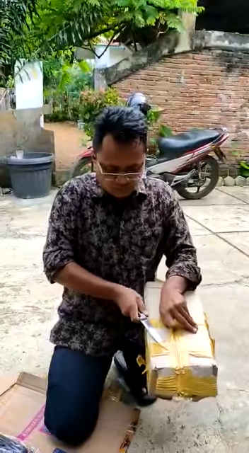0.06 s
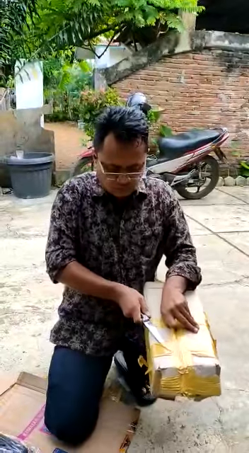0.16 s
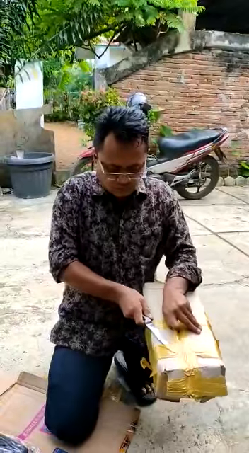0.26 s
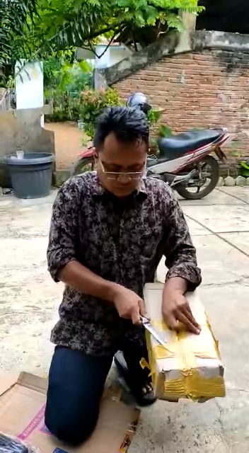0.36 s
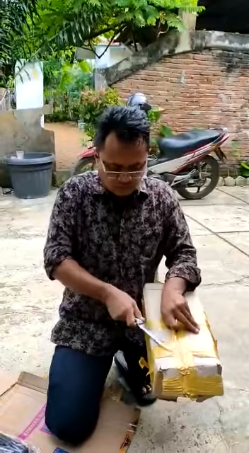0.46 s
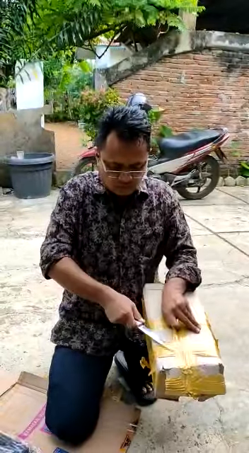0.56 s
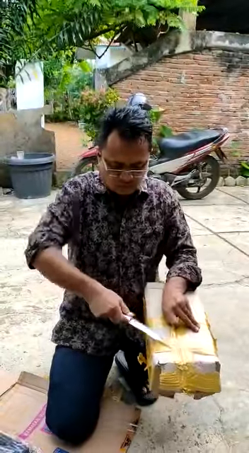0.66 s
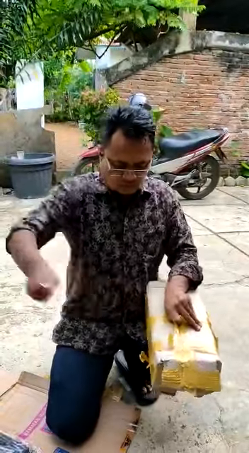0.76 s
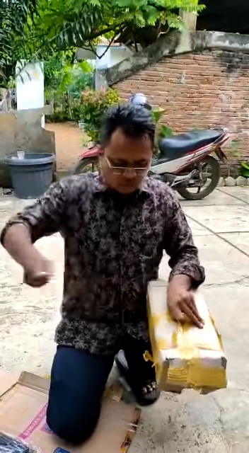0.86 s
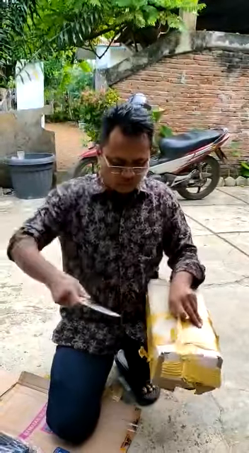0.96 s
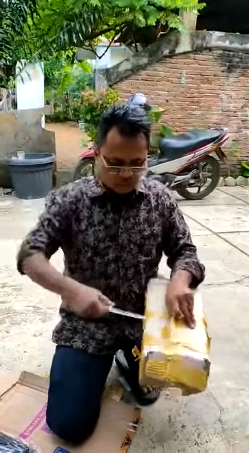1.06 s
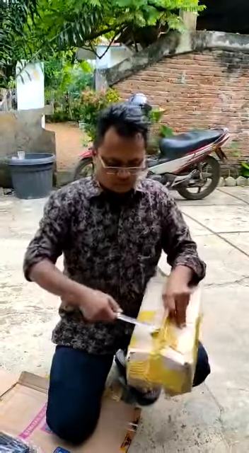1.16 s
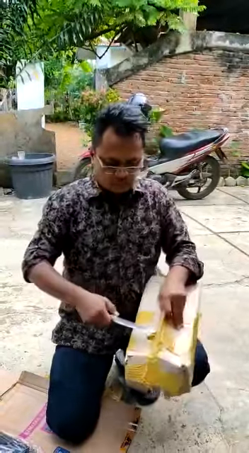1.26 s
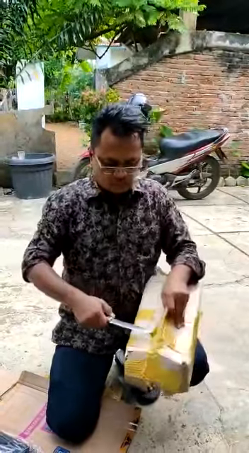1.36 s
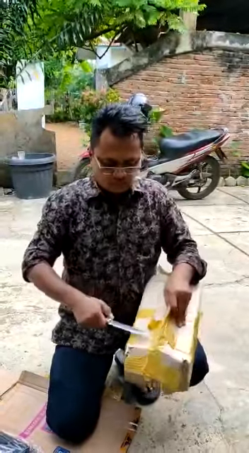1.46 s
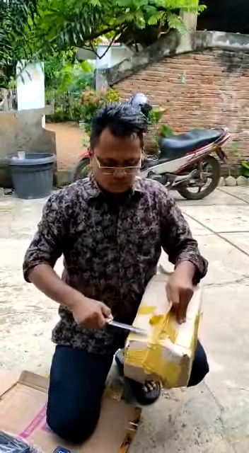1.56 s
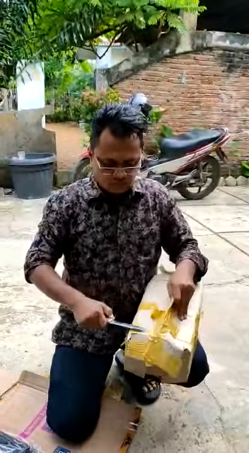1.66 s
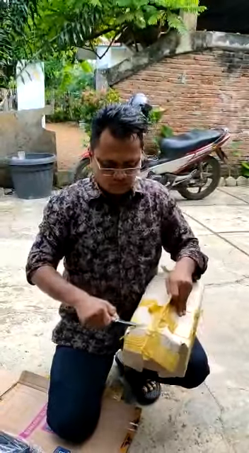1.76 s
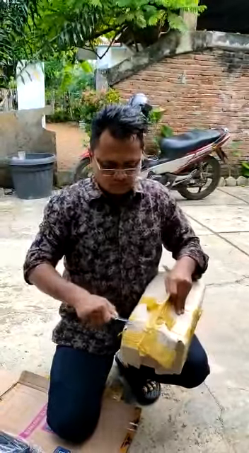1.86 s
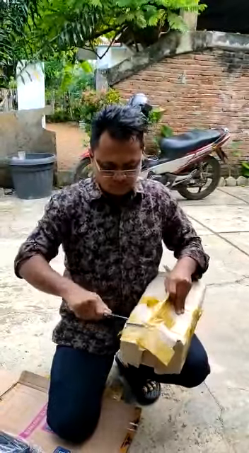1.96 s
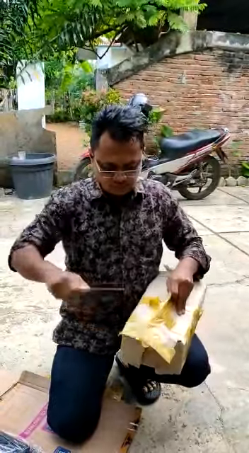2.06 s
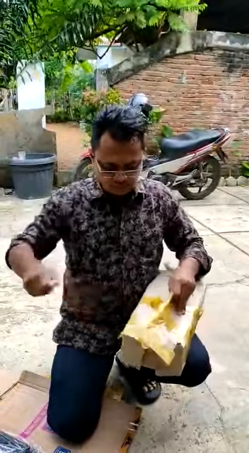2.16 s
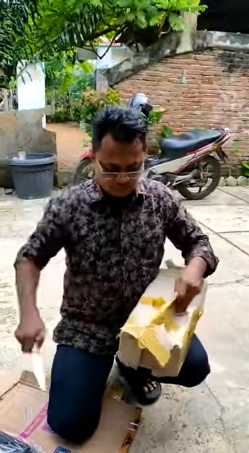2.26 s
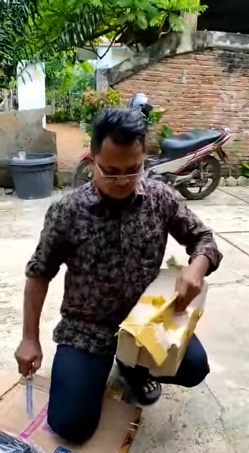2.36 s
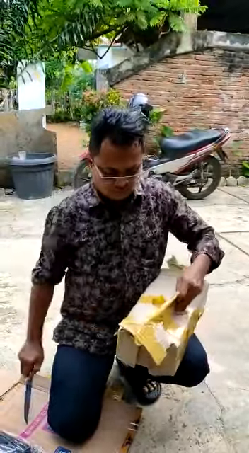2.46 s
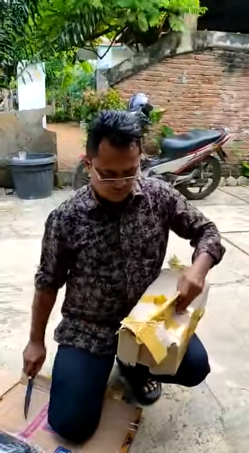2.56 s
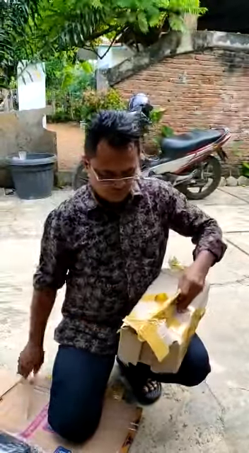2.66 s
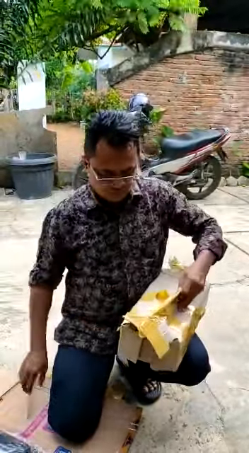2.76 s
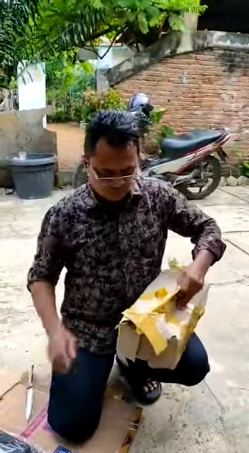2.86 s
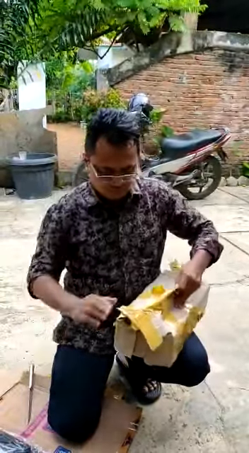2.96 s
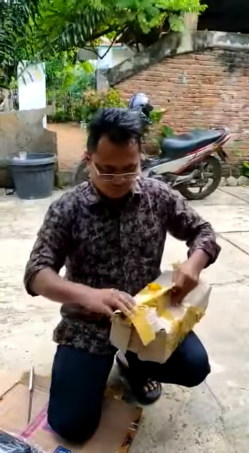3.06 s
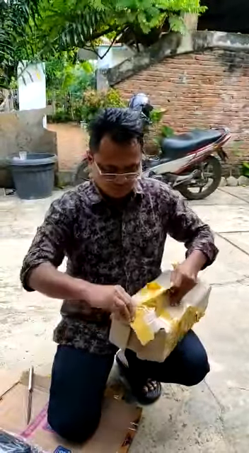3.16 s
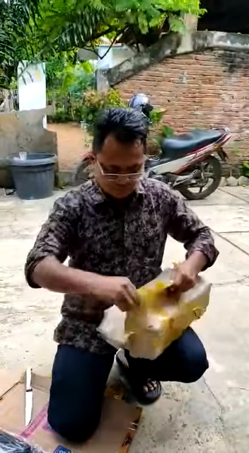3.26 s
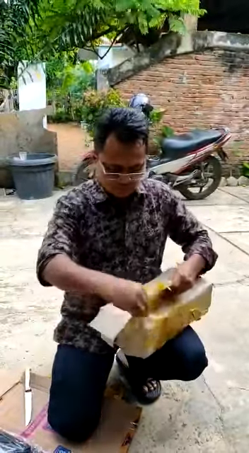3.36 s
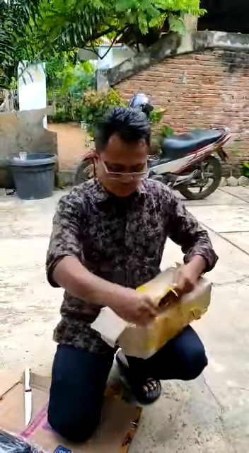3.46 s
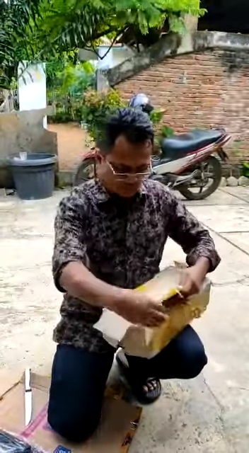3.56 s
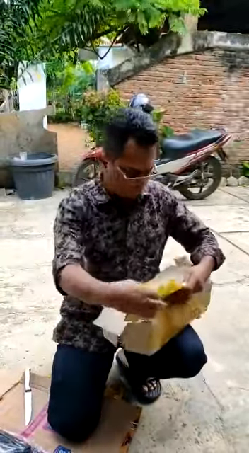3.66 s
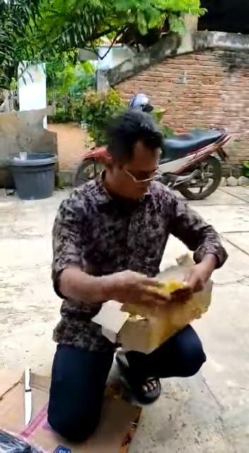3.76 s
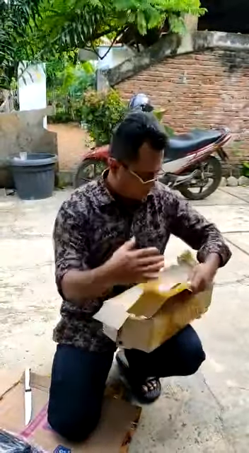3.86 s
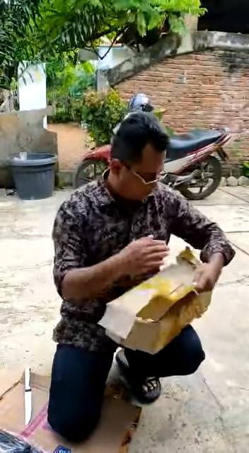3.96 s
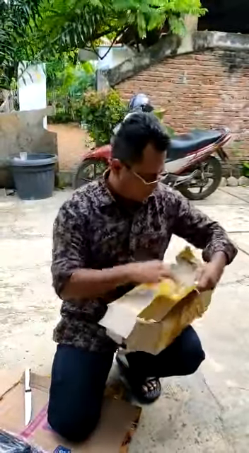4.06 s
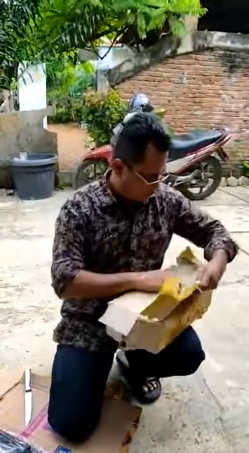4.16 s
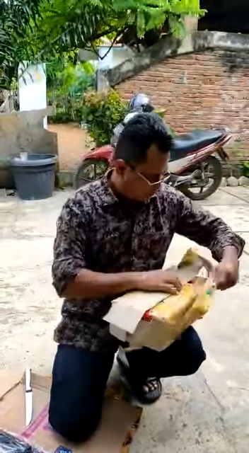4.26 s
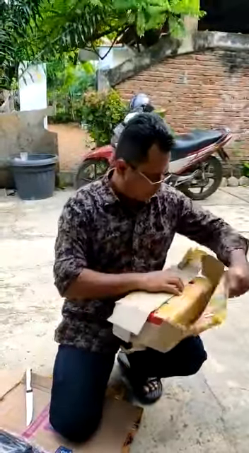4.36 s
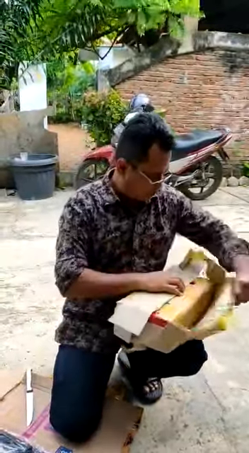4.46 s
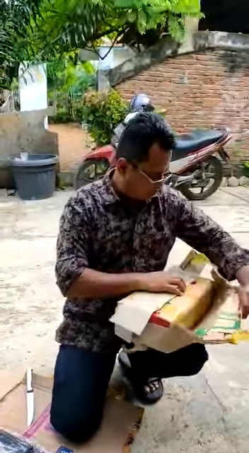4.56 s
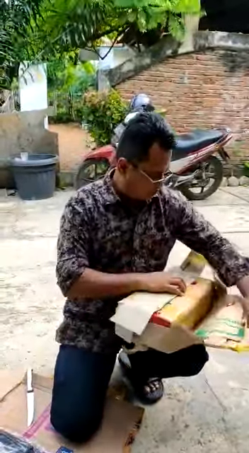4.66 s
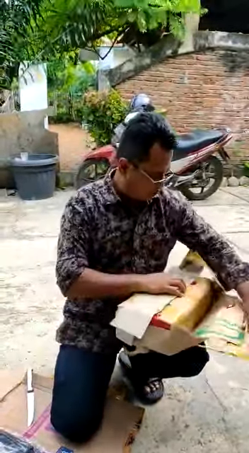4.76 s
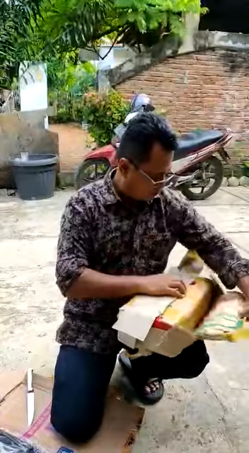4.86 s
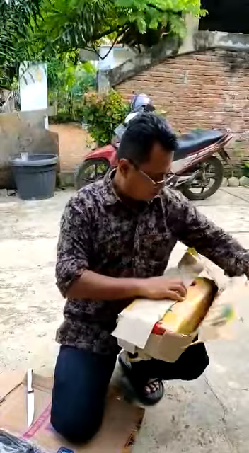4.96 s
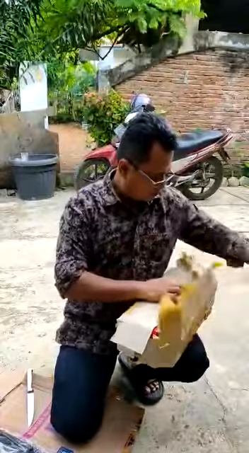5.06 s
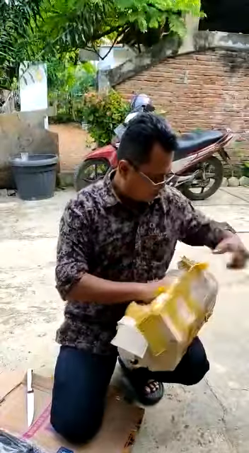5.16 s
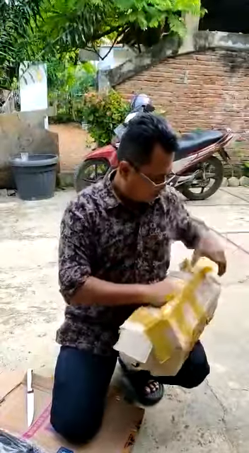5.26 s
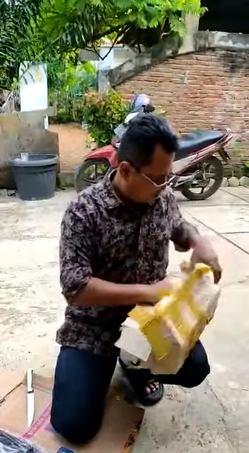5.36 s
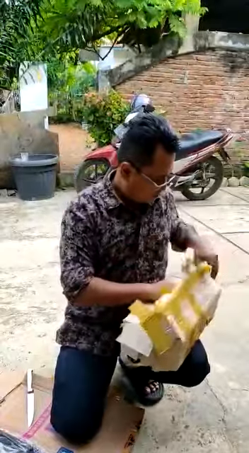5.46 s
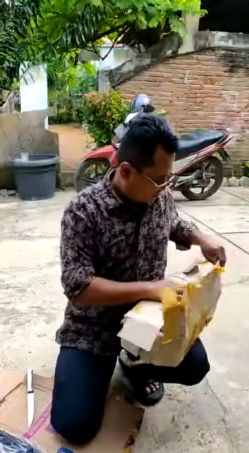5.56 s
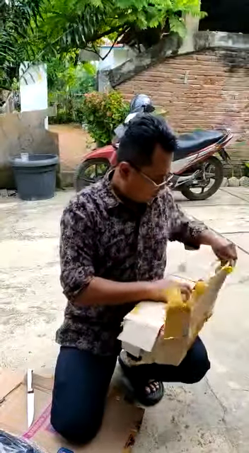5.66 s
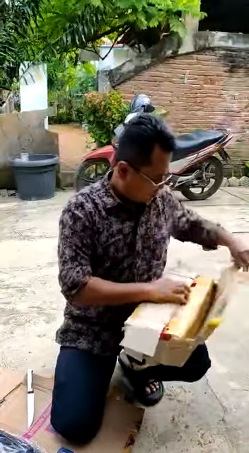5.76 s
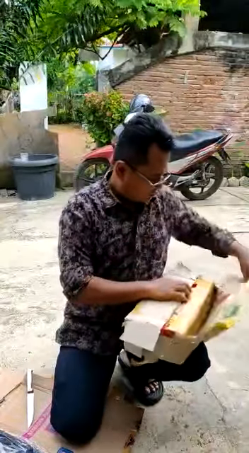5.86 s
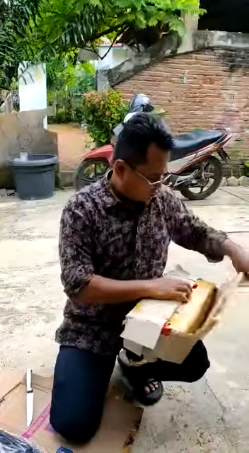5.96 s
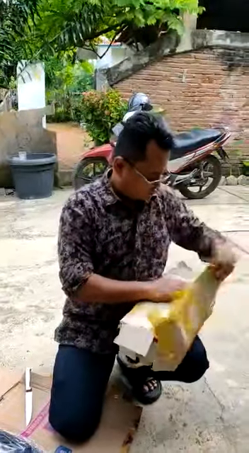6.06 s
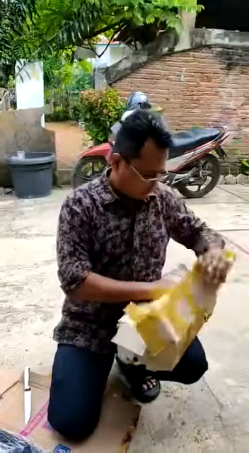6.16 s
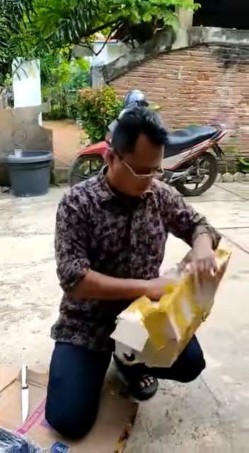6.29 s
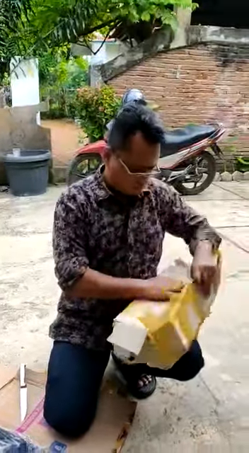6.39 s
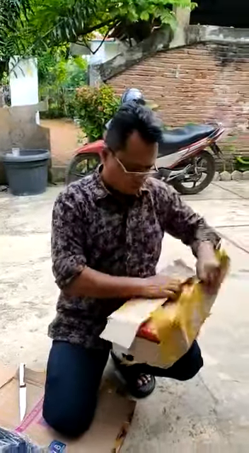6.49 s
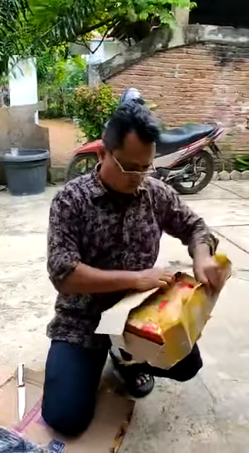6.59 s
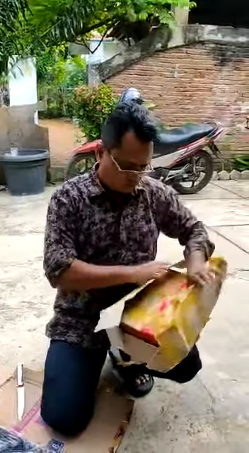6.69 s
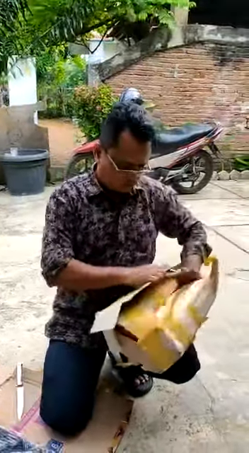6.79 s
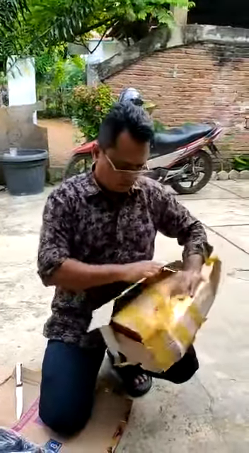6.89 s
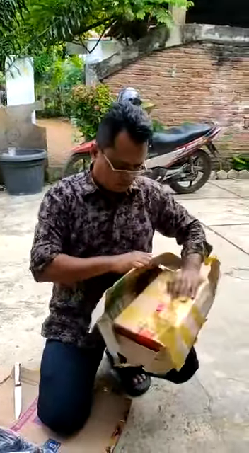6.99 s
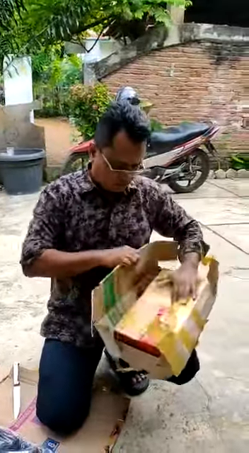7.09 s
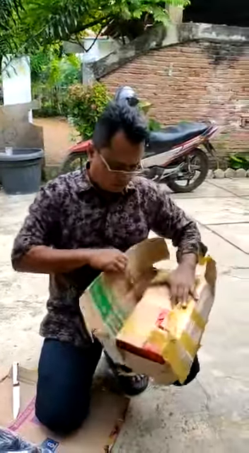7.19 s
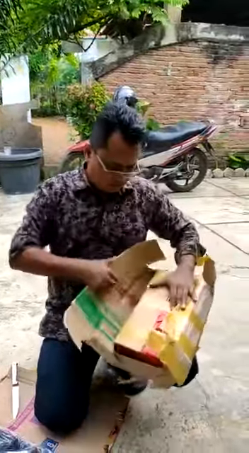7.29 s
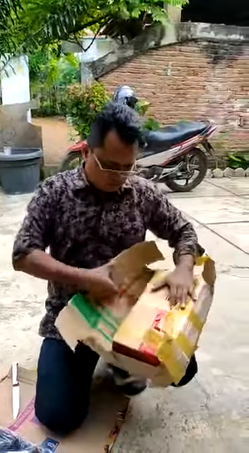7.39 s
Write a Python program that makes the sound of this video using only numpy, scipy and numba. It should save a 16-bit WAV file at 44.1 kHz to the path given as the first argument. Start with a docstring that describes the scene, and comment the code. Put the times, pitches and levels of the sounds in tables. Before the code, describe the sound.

Bright tape crackles, sharp tearing snaps and hollow cardboard thumps as a taped parcel is cut and pulled apart in a quiet yard.

```python
"""A taped cardboard parcel is slit with a knife and pulled open in a walled yard, a metre or two from a phone.
Tiny random fractures make every snap, crinkle and scrape; they ring the bright tape film, the cardboard flaps
and the hollow box. The knife is put down on a flat sheet and rattles; gliding tones make faint squeals.
Random echoes give the walls' short tail. Behind it all, filtered noise makes faint air and a rumble that surges."""
import sys
import numpy as np
from scipy import signal
from scipy.fft import rfft, irfft, next_fast_len
from scipy.io import wavfile
from scipy.ndimage import uniform_filter1d
from numba import njit

SR = 44100
rng = np.random.default_rng(int(sys.argv[2]) if len(sys.argv) > 2 else 0)


def materialize(psi):
    """Save the field psi as 16-bit PCM at rate SR to the path in sys.argv[1].

    A 1-D psi becomes a single channel; in a 2-D psi each row is a channel.
    """
    bounded = np.clip(np.atleast_2d(psi).T, -1, 1)
    quanta = np.round(bounded * 32767).astype(np.int16)
    wavfile.write(sys.argv[1], SR, quanta)


N = 327516
TIME = np.arange(N) / SR

# Levels in these tables are starting points: the functions below trim them, and the yard adds echoes.

# still outdoor air, its balance of low and high: [pitch_hz, level_db]
AIR = [(25, -6), (60, 6.5), (110, 2), (250, -4.5), (450, -6.5), (900, -25), (2500, -40.5), (6500, -24),
       (10000, -25.5), (16000, -30.5)]
# distant rumble, coming in surges: [time_s, level_db]
RUMBLE_LEVEL = [(0.0, -90.5), (2.3, -85), (2.56, -70), (2.92, -74.5), (3.1, -77), (3.7, -84.5),
                (4.7, -74.5), (4.97, -59.5), (5.16, -77.5), (5.24, -59), (5.42, -69.5), (5.55, -56.5),
                (5.9, -61.5), (6.2, -56.5), (6.36, -71.5), (6.45, -60.5), (6.8, -64), (7.42, -67)]
# the rumble's resonances: [pitch_hz, width_hz, level_db]
RUMBLE_BANDS = [(55, 28, -5), (82, 12, 4.5), (113.3, 15, 2.5), (147, 10, -9.5)]

# colour of the yard's echoes: [pitch_hz, level_db]
YARD_COLOUR = [(80, -4.5), (300, 4.5), (1000, -3.5), (2500, 1), (7000, -3.5), (15000, 2)]
# how far the left port leads the right for direct sound: [pitch_hz, lead_radians]
LEFT_LEAD = [(60, 0.01), (580, 0.27), (1000, 1.1), (1550, 1.36), (2550, 0.9), (3200, 1.3), (3800, 1.5),
             (5800, 2.5), (7300, 3.36), (9200, 1.5), (16000, 0.4)]
# where on the parcel the hands work: [time_s, left_minus_right_db]
SIDE = [(0, 0.5), (0.7, 0.1), (1.15, 0.5), (2.0, 1.5), (3.2, 1.5), (3.7, 1.7), (4.3, 0), (5.1, 0.2),
        (6.2, 1.9), (6.7, 1.1), (7.3, 0)]
# how differently the two ports colour the sound: [pitch_hz, left_minus_right_db]
PORTS = [(100, 2.5), (700, -0.5), (1300, -2), (2100, 3.5), (3000, 3.5), (4000, 3.5), (5600, 9), (8000, 2),
         (10500, -7.5), (15000, 3)]

# what the tape film, the flaps and the box radiate: [pitch_hz, level_db]
FILM = [(800, -66.5), (2000, -39), (3000, 0), (4000, -4), (5500, 0.5), (6800, 9), (8300, 4), (10000, -6.5),
        (12500, -12), (15500, -13)]
FLAP = [(300, -29), (550, -14.5), (800, 1), (1250, 5), (1650, 3.5), (2200, 5.5), (3000, -5), (4000, -17),
        (7000, -28.5)]
BOX = [(40, -16), (100, -3.5), (200, -2), (330, -0.5), (480, 3), (650, 3), (900, -29), (1600, -41.5)]
# a crease letting go is brighter than rubbed film: [pitch_hz, level_db]
SNAP = [(800, -45), (2000, -23), (3000, -7), (4200, -4), (6500, 10), (8300, 9), (10500, -5.5), (13000, -3),
        (16000, -10)]
# panel and cavity resonances of the parcel: [pitch_hz, width_hz, level_over_broad_response_db]
PANELS = [(230, 19, -7), (329, 6.7, -7), (420.4, 30, 0.5), (716, 89, -4.5), (954, 18, -13),
          (1253, 25, -1.5)]
# ring of the hollow box: it sinks a little, then climbs as the mouth is pulled wider: [time_s, pitch_hz]
HOLLOW_PITCH = [(0.7, 312), (4.9, 280), (5.85, 380), (7.0, 560)]

# faint squeals, nearly pure in tone: [start_s, length_s, first_hz, last_hz, level_db]
SQUEALS = [(0.317, 0.054, 440, 418, -60), (0.398, 0.03, 390.3, 330, -49), (0.442, 0.056, 355, 397, -60.5),
           (0.474, 0.046, 569, 580, -67), (0.591, 0.046, 1087, 1125, -60),
           (0.634, 0.073, 1140, 1220, -69.5), (2.703, 0.33, 1106, 1131, -70.5),
           (2.924, 0.061, 896, 852, -67.5), (5.396, 0.09, 910, 901, -68.5), (5.469, 0.12, 900, 930, -74),
           (6.068, 0.12, 500, 602, -63.5), (6.802, 0.091, 467, 632, -71.5)]
# cardboard creaking as it is dragged: [start_s, length_s, pitch_hz, width_hz, level_db]
CREAKS = [(0.0, 0.0096, 537, 201, -63), (0.194, 0.047, 423, 78, -70), (0.328, 0.044, 510, 162, -62.5),
          (0.4, 0.048, 537, 195, -62), (0.431, 0.097, 268, 200, -61), (0.591, 0.073, 893, 202, -60.5),
          (1.469, 0.078, 3280, 600, -64), (2.759, 0.21, 1060, 199, -71.5), (3.972, 0.08, 1120, 530, -50),
          (3.976, 0.055, 564, 159, -54.5), (4.534, 0.17, 302, 109, -59), (4.438, 0.046, 1990, 800, -53),
          (4.533, 0.17, 855, 400, -52.5), (4.667, 0.062, 970, 400, -45), (6.425, 0.035, 940, 410, -53),
          (6.499, 0.16, 1710, 900, -61), (6.659, 0.13, 990, 298, -71), (6.66, 0.16, 2000, 696, -62.5),
          (6.881, 0.076, 466, 202, -61), (7.251, 0.08, 850, 400, -43.5)]
# the knife is put down, tip then handle: [start_s, level_db]
KNIFE = [(2.525, -41), (2.590, -35)]
# the knife on the flat sheet: [pitch_hz, width_hz, level_db]
KNIFE_MODES = [(213, 150, -3.5), (670, 270, 3), (846, 370, 2), (1090, 400, -6.5), (2120, 2000, -28)]
# dull bumps of the hands and flaps on the box: [start_s, level_db, wall_pitch_hz, contact_s]
KNOCKS = [(0.138, -53, 784, 0.0056), (1.161, -36, 360, 0.004), (3.274, -43.5, 247, 0.005),
          (4.334, -30, 270, 0.0027), (4.362, -40.5, 268, 0.005), (4.492, -42, 274, 0.0053),
          (4.672, -40, 296, 0.0064), (4.717, -53, 280, 0.0044), (5.843, -44, 320, 0.0047),
          (5.853, -35.5, 410, 0.003), (6.987, -50, 516, 0.0022)]
# the parcel's big panels flex with a low boom: [start_s, level_db, pitch_hz]
BOOMS = [(0.716, -43.5, 174.8), (0.722, -50, 94.5), (0.723, -45, 220), (1.161, -52, 213),
         (2.05, -53.5, 134), (2.052, -55, 205), (2.594, -47.5, 221), (2.865, -63, 57), (2.925, -63.5, 78.4),
         (4.337, -47, 119), (4.891, -55, 95), (5.654, -48, 127), (7.365, -64, 111)]
# short bright ticks: creases popping in the tape, and the put-down knife rattling from 2.55 to 2.68 s:
# [start_s, film_level_db, flap_level_db]
TICKS = [(0.0533, -46, -71), (0.0963, -43.5, -72), (0.1408, -42, -61.5), (0.1966, -46, -80),
         (0.449, -60, -90), (0.471, -64, -93), (0.9436, -43.5, -45), (0.988, -54, -57),
         (1.3377, -52.5, -59), (1.938, -49, -41.5), (1.965, -43.5, -43.5), (2.2477, -49.5, -55),
         (2.283, -56.5, -55.5), (2.405, -68, -68), (2.549, -58, -53.5), (2.644, -60, -51),
         (2.657, -55, -54), (2.681, -54, -53), (2.783, -53.5, -55), (3.395, -54, -65), (3.444, -59, -69),
         (3.4517, -46, -56.5), (3.6526, -53, -75), (3.661, -46.5, -53.5), (3.743, -54.5, -80),
         (3.769, -51.5, -66), (3.88, -43.5, -47), (4.0809, -54.5, -63), (4.2046, -51.5, -68),
         (4.238, -50, -48.5), (5.0985, -50.5, -56.5), (5.1174, -51.5, -58), (5.179, -55, -68),
         (5.212, -59.5, -68), (5.4041, -60, -73), (5.5362, -46.5, -69), (5.549, -57, -69),
         (5.7611, -49.5, -73), (5.903, -45.5, -61), (6.027, -57, -54), (6.0763, -51, -60),
         (6.0854, -49, -59), (6.096, -45, -55), (6.217, -52, -53), (6.351, -62.5, -78), (6.362, -54, -69.5),
         (6.754, -51, -65), (6.8419, -55, -74), (7.113, -50, -46)]
# the blade runs along the seam and the cut flap rings ever lower:
# [start_s, length_s, first_hz, last_hz, final_level_db]
SLICE = (1.09, 0.0522, 2399.5, 949.5, -36)
# strokes of the blade and hands; the levels are those at the start, and a negative fade grows louder:
# [start_s, length_s, film_level_db, flap_level_db, box_level_db, fade_db, scrape_pitch_hz]
STROKES = [(0.0, 0.039, -57, -77, -63, 11, 620), (0.397, 0.13, -66, -94, -49, 24, 620),
           (0.93, 0.27, -57.5, -79.5, -80.5, -6.5, 2150), (1.398, 0.082, -54.5, -63, -82.5, 3.5, 1280),
           (1.512, 0.091, -52, -62.5, -82, 10, 1925), (1.72, 0.039, -68, -75, -67.5, 14, 888),
           (1.814, 0.035, -59.5, -63, -88.5, 1, 1770), (1.941, 0.032, -45.5, -45.5, -55.5, 3, 1370),
           (2.235, 0.33, -57, -67, -81.5, -2, 1960), (2.602, 0.16, -51.5, -49.5, -60.5, 10.5, 850),
           (2.866, 0.088, -67.5, -80, -75.5, 4.5, 1006), (3.15, 0.051, -45.5, -57, -73, 4, 1700),
           (3.222, 0.055, -42, -41.5, -60, 1.5, 2150), (3.281, 0.21, -44.5, -52.5, -52.5, 16.5, 1940),
           (3.518, 0.14, -46, -54.5, -98, -1.5, 1950), (3.66, 0.035, -51, -57.5, -64, 7, 1960),
           (3.832, 0.27, -51, -50.5, -56, 20, 1190), (4.138, 0.12, -56.5, -65.5, -67.5, 13, 1210),
           (4.228, 0.22, -46.5, -47.5, -60, 10.5, 1010), (4.449, 0.22, -44.5, -45, -55.5, 1, 920),
           (4.679, 0.044, -38.5, -58, -52, 11.5, 1010), (4.777, 0.22, -70.5, -70.5, -74.5, -16.5, 1080),
           (5.099, 0.084, -49.5, -58, -90, 13, 2060), (5.403, 0.061, -69.5, -76, -86, 13, 886),
           (5.52, 0.13, -58, -65, -80, 10, 2000), (5.652, 0.2, -44.5, -52, -63, 14.5, 1700),
           (5.862, 0.17, -46.5, -46.5, -44.5, 15.5, 970), (6.007, 0.22, -55.5, -60.5, -73, -6.5, 1680),
           (6.367, 0.038, -58, -75.5, -83, 2, 1490), (6.425, 0.29, -48, -51, -70, 5, 1700),
           (6.74, 0.29, -53, -66, -76, 9.5, 1190), (6.985, 0.068, -41, -34, -37, 10, 905),
           (7.076, 0.23, -48, -49.5, -56, 9.5, 895), (7.26, 0.067, -45, -38.5, -52.5, -1, 1040),
           (7.369, 0.062, -33.5, -25, -38.5, 7.5, 1370)]
# tape pulled taut crackles ever louder until it gives:
# [start_s, length_s, final_film_level_db, final_flap_level_db, scrape_pitch_hz]
PULLS = [(0.642, 0.076, -41, -48, 1350), (1.092, 0.045, -37.5, -45.5, 1560),
         (1.975, 0.029, -37.5, -44, 1414), (3.1, 0.036, -45.5, -54, 1513), (3.779, 0.042, -40, -50.5, 1820),
         (4.283, 0.04, -37.5, -43, 1380), (5.483, 0.085, -47, -55.5, 2104)]
# tape and cardboard giving way:
# [start_s, film_level_db, flap_level_db, box_level_db, flap_pitch_hz, decay_s]
RIPS = [(0.695, -37, -54, -64, 1230, 0.0033), (0.7025, -16.5, -21, -34, 1130, 0.0023),
        (0.708, -25, -30.5, -45, 1140, 0.0012), (0.7153, -36, -23, -34, 915, 0.002),
        (0.7216, -42, -35.5, -28.5, 740, 0.0005), (1.127, -51, -37, -60, 960, 0.00071),
        (1.1442, -37, -37.5, -60, 1250, 0.005), (1.1568, -35, -42, -40, 1090, 0.004),
        (1.1595, -28.5, -24.5, -30.5, 905, 0.002), (1.199, -35.5, -50, -48.5, 830, 0.0018),
        (2.0007, -41, -43, -71, 1206, 0.0036), (2.0135, -38, -46, -71, 1230, 0.0026),
        (2.0169, -29.5, -41, -63, 1040, 0.0018), (2.0216, -26, -34, -53, 1170, 0.0016),
        (2.0478, -30.5, -25, -35.5, 752, 0.0019), (3.1334, -48.5, -42.5, -79.5, 1112, 0.0034),
        (3.1553, -44, -43.5, -79, 2170, 0.0095), (3.2096, -48, -52, -79, 2200, 0.0041),
        (3.223, -43.5, -46, -74, 2040, 0.0045), (3.273, -42, -41.5, -44.5, 1700, 0.0012),
        (3.2926, -42.5, -45.5, -59, 2180, 0.0008), (3.307, -64, -50, -70, 2320, 0.002),
        (3.5214, -43, -78, -83, 2150, 0.0067), (3.5857, -57, -53, -77, 1150, 0.008),
        (3.8017, -49, -42, -73, 1730, 0.0092), (3.832, -34.5, -37.5, -43.5, 1680, 0.0065),
        (4.313, -34.5, -42, -46, 1470, 0.025), (4.32, -35, -35.5, -42, 1440, 0.008),
        (4.332, -37.5, -36, -58, 685, 0.0037), (4.4843, -40.5, -45, -43.5, 604, 0.0086),
        (4.6668, -39.5, -36, -43, 840, 0.0045), (4.8825, -30, -46.5, -58, 1250, 0.0059),
        (4.8918, -35, -32, -38.5, 2650, 0.0019), (5.646, -41, -48, -57.5, 1774, 0.0042),
        (5.6539, -43, -44, -49, 1350, 0.0025), (5.689, -42, -47, -51.5, 2230, 0.0011),
        (5.846, -60, -49, -54, 1510, 0.0039), (5.855, -62, -48, -40, 1080, 0.0063),
        (6.184, -53, -53, -73, 2200, 0.0063), (6.963, -59, -58, -51.5, 578, 0.0069),
        (6.974, -56, -44, -44, 806, 0.0047), (6.986, -57, -40, -41.5, 950, 0.0028),
        (7.239, -52, -44, -71, 850, 0.0029), (7.3153, -57, -44, -64, 2100, 0.004),
        (7.3591, -31.5, -27.5, -39, 2110, 0.0048), (7.3684, -32, -26, -50, 2080, 0.0053)]

TOP_HZ = 16300  # the treble is cut above this
ATTACK_S, RELEASE_S = 0.011, 0.0023  # how fast rubbing starts and stops
PULL_RISE_DB = 13  # from the first tug to the break
LOOSE = 0.9  # strength of the fibres that let go after a rip
BOOM_SHARE, BOOM_DECAY_S = 0.55, 0.024  # resonance width as a share of pitch; how the push dies away


def undb(db):
    """Decibels to gain."""
    return 10 ** (np.asarray(db) / 20)


def unit(x):
    """Scale to an rms (average strength) of 1."""
    return x / np.sqrt(np.mean(x ** 2) + 1e-20)


def steady(x, span_s):
    """Hold the average power near 1 over the span, keeping the finer grain."""
    power = np.maximum(uniform_filter1d(x ** 2, int(span_s * SR) + 1), 0)
    return x / np.sqrt(power + 1e-4 * np.mean(x ** 2))


def curve(rows):
    """Rows of (time_s, value) joined by straight lines."""
    return np.interp(TIME, *np.transpose(rows))


def walk(rate_hz):
    """Smooth random wander, spread near 1."""
    hold = max(int(SR / rate_hz), 2)
    steps = np.repeat(rng.standard_normal(N // hold + 1), hold)
    smooth = uniform_filter1d(uniform_filter1d(steps, hold), hold)
    return unit(smooth[:N])


def grains(count, rate_hz, spread_db):
    """Tiny fractures at random moments: many small, a few large."""
    size = undb(spread_db * np.minimum(rng.exponential(size=count), 4))
    happens = rng.random(count) < rate_hz / SR
    return size * rng.choice([-1, 1], count) * happens


def through(x, impulse_response):
    """Pass a sound through an impulse response."""
    return signal.fftconvolve(x, impulse_response)[:len(x)]


def response(points, share=1, size=4096):
    """Impulse response with the given (pitch_hz, level_db) outline, reacting as early as it can."""
    hz, db = np.transpose(points)
    grid = np.maximum(np.arange(size // 2 + 1) * SR / size, 1)
    outline_db = share * np.interp(np.log(grid), np.log(hz), db)
    # folding the cepstrum puts all the response after the blow (minimum phase)
    cepstrum = irfft(np.log(undb(outline_db)))
    cepstrum[1:size // 2] *= 2
    cepstrum[size // 2 + 1:] = 0
    return irfft(np.exp(rfft(cepstrum)))


@njit
def resonate(x, hz, width):
    """One resonance whose pitch may move: a state-variable band-pass filter."""
    out, band_state, low_state = np.empty(len(x)), 0., 0.
    for i in range(len(x)):
        g, damping = np.tan(np.pi * hz[i] / SR), width / hz[i]
        v = (band_state + g * (x[i] + 1e-18 - low_state)) / (1 + g * (g + damping))
        band_state = 2 * v - band_state
        low_state = low_state + 2 * g * v
        out[i] = damping * v
    return out


def band(x, hz, width_hz):
    """One resonance of fixed pitch."""
    return resonate(x, np.full(len(x), float(hz)), float(width_hz))


def double_band(x, hz, width_hz):
    """The same fixed resonance twice, for steeper sides."""
    return band(band(x, hz, width_hz), hz, width_hz)


def ring(x, modes):
    """Sum of fixed resonances."""
    return sum(undb(db) * band(x, hz, width_hz) for hz, width_hz, db in modes)


def outdoors(air_db=-78, air_apart=0.43, rumble_apart=0.51):
    """Faint air and a surging far-off rumble: filtered noise, mostly alike at both ports."""
    shared_air, shared_low = rng.standard_normal((2, N))
    air, rumble = [], []
    for _ in range(2):
        hiss = shared_air + air_apart * rng.standard_normal(N)
        air.append(unit(through(hiss, response(AIR))))
        low = shared_low + rumble_apart * rng.standard_normal(N)
        rumble.append(steady(ring(ring(low, RUMBLE_BANDS), RUMBLE_BANDS), 0.038))
    air_gain = undb(air_db + 0.41 * walk(3))
    return np.array(air) * air_gain + np.array(rumble) * undb(curve(RUMBLE_LEVEL))


def reflections(x, envelope, alike_hz=650, size=4096):
    """Echoes with the given envelope; the parcel keeps moving, so their pattern is new from moment to moment."""
    out = np.zeros((2, N + 2 * size + len(envelope)))
    padded = np.pad(x, size)
    window = np.sin(np.pi * np.arange(size) / size)
    for start in range(0, N + size, size // 2):
        paths = rng.standard_normal((2, len(envelope))) * envelope
        echo = signal.fftconvolve([padded[start:start + size] * window], paths, axes=1)
        out[:, start:start + size + len(envelope) - 1] += echo
    mid, side = out[:, size:size + N]
    # long waves reach both ports alike
    side = signal.sosfilt(signal.butter(2, alike_hz, "high", fs=SR, output="sos"), side)
    return np.array([mid + side, mid - side]) / np.sqrt(2)


def yard(x, near_db, tail_db, t60_s=0.35, near_decay_s=0.012, size=16000):
    """Direct sound leads at the left port; ground and body scatter it at once, the walls leave a short tail."""
    t = np.arange(size) / SR
    padded = next_fast_len(N + size)
    lead = np.interp(np.arange(padded // 2 + 1) * SR / padded, *np.transpose(LEFT_LEAD))
    right = irfft(rfft(x, padded) * np.exp(-1j * lead), padded)[:N]
    direct = np.array([x, right])
    near = np.exp(-t / near_decay_s) * (t > .0002)
    tail = np.exp(-np.log(1000) * t / t60_s) * (1 - np.exp(-t / 0.013))
    near_part = undb(near_db) * near / np.linalg.norm(near)
    tail_part = undb(tail_db) * tail / np.linalg.norm(tail)
    echoes = reflections(x, np.hypot(near_part, tail_part))
    return direct + np.array([through(echo, response(YARD_COLOUR)) for echo in echoes])


def hollow(x, hz, width_hz=260, wall_db=-2):
    """The air in the box rings; some sound comes straight through the walls."""
    return resonate(x, np.ones(len(x)) * hz, float(width_hz)) + undb(wall_db) * x


def patch(part, low_hz=5400, high_hz=9000, width_hz=1400, patch_db=-2):
    """Each patch of tape favours a pitch of its own."""
    return part + undb(patch_db) * band(part, rng.uniform(low_hz, high_hz), width_hz)


def facets(x, low_hz, high_hz, spread_db, rate_hz, count=9):
    """A crumpling sheet is many small facets: each has its own pitch, and they take turns at ringing."""
    pitches = np.geomspace(low_hz, min(high_hz, .4 * SR), count)
    return sum(band(x, hz, hz / 5) * undb(spread_db * walk(rate_hz)) for hz in pitches)


def crackle(low_hz, high_hz, count=9):
    """Lone creases buckle, each at its own pitch."""
    pitches = np.geomspace(low_hz, min(high_hz, .4 * SR), count)
    return sum(band(grains(N, 28, 2.6), hz, hz / 3) for hz in pitches)


def squeals():
    """Short gliding tones that waver in strength and pitch; the low ones waver most for their pitch."""
    out = np.zeros(N)
    waver_hz, flutter = 11 * walk(260), undb(2.5 * walk(150))
    for start_s, length_s, first_hz, last_hz, db in SQUEALS:
        along = np.clip((TIME - start_s) / length_s, 0, 1)
        hz = first_hz + (last_hz - first_hz) * along + waver_hz
        phase = 2 * np.pi * np.cumsum(hz) / SR
        out += undb(db) * 2 * np.sin(np.pi * along ** .7) * np.sin(phase)
    return out * flutter


def creaks(slip_rate_hz=1400):
    """Quick slips ring one panel; each creak starts fast and relaxes."""
    out = np.zeros(N)
    for start_s, length_s, hz, width_hz, db in CREAKS:
        size, start = int(length_s * SR), max(int(start_s * SR), 0)
        tone = double_band(grains(size, slip_rate_hz, 2.2), hz, width_hz)
        swell = np.sin(np.pi * np.linspace(0, 1, size) ** .5)
        out[start:start + size] += undb(db) * unit(tone * swell)
    return out


def contact(start_s, length_s, slope_db):
    """Gain of one touch: quick attack, a rise or fade in dB while it lasts, quick release."""
    before = (start_s - TIME) / ATTACK_S
    after = (TIME - start_s - length_s) / RELEASE_S
    outside = np.maximum(np.maximum(before, after), 0)
    slope = undb(slope_db * np.clip((TIME - start_s) / length_s, 0, 1))
    return slope * np.exp(-np.minimum(outside, 20))


def slicing(width_hz=650, rise_db=13, slip_rate_hz=2600):
    """Quick slips of the blade ring a lengthening strip of flap, louder as it goes."""
    start_s, length_s, first_hz, last_hz, db = SLICE
    along = np.clip((TIME - start_s) / length_s, 0, 1)
    hz = first_hz * (last_hz / first_hz) ** along
    slips = grains(N, slip_rate_hz, 1.5)
    tone = resonate(resonate(slips, hz, float(width_hz)), hz, float(width_hz))
    return undb(db - rise_db) * contact(start_s, length_s, rise_db) * steady(tone, .02)


def effort():
    """How hard pulls and strokes work film, flap and box; the strongest touch weighs most in the scrape's pitch."""
    film, flap, box, pitch = np.zeros((4, N))
    for start_s, length_s, film_db, flap_db, box_db, fade_db, hz in STROKES:
        gain = contact(start_s, length_s, -fade_db)
        film += undb(film_db) * gain
        flap += undb(flap_db) * gain
        box += undb(box_db) * gain
        pitch += hz * undb(flap_db) * gain
    for start_s, length_s, film_db, flap_db, hz in PULLS:
        gain = contact(start_s, length_s, PULL_RISE_DB) * undb(-PULL_RISE_DB)
        film += undb(film_db) * gain
        flap += undb(flap_db) * gain
        pitch += hz * undb(flap_db) * gain
    return film, flap, box, pitch / flap


def handling(film, flap, box, film_db=-2, flap_db=-3, box_db=-3, squeak_width_hz=400, snap_db=-12):
    """Film crinkles in grains; cardboard edges stick and slip, ringing the free length of flap and the box."""
    film_gain, flap_gain, box_gain, scrape_hz = effort()
    # creases give way in little bunches, and jolt the cardboard under them
    creases = unit(grains(N, 1000, 5)) * undb(3.5 * walk(170))
    slips = unit(grains(N, 900, 4)) * undb(3.5 * walk(90)) + .7 * creases

    scrape = through(facets(slips, 600, 4200, spread_db=5, rate_hz=45, count=11), flap)
    scrape = unit(scrape) + .7 * unit(through(crackle(700, 3600), flap))
    scrape = scrape + resonate(scrape, scrape_hz, float(squeak_width_hz))

    # now and then a crease snaps brightly
    snaps = unit(through(grains(N, 190, 1.7), response(SNAP)))
    crinkle = unit(through(creases, film)) + unit(through(crackle(2500, 12000), film))
    crinkle = steady(crinkle + undb(snap_db) * snaps, 0.14)

    drag = hollow(through(slips, box), curve(HOLLOW_PITCH))
    tape = undb(film_db) * film_gain * crinkle
    cardboard = undb(flap_db) * flap_gain * steady(scrape, 0.1)
    return tape + cardboard + undb(box_db) * box_gain * steady(drag, 0.013)


def add_blow(track, start_s, part, db, decay_s, first=3, loose=0, strain_s=0.0017, loose_decay_s=0.019, size=6000):
    """A blow swells, breaks and dies away in an avalanche of grains that rings a part; loose ones follow singly."""
    lead = size // 16
    t = (np.arange(size) - lead) / SR
    straining = 0.18 * np.exp(-np.abs(t) / strain_s)
    breaking = np.exp(-np.abs(t) / max(decay_s, .0002))
    envelope = np.where(t < 0, straining, breaking)
    stragglers = grains(size, 260, 3) * (t > .004)
    push = grains(size, 20000, 2.2) * envelope + loose * stragglers * np.exp(-np.abs(t) / loose_decay_s)
    push[lead] = first
    sound = through(push, part)
    # db sets the level of the loudest 4 ms
    sound *= undb(db) / np.sqrt(uniform_filter1d(sound ** 2, size=176).max())
    start = max(int(start_s * SR) - lead, 0)
    track[start:start + size] += sound[:N - start]


def knife_down(track):
    """The knife lands on a soft sheet that takes the edge off it: steep resonances."""
    click = signal.unit_impulse(4096)
    sheet = sum(undb(db) * double_band(click, hz, width_hz) for hz, width_hz, db in KNIFE_MODES)
    for start_s, db in KNIFE:
        add_blow(track, start_s, sheet, db, decay_s=0.003, first=9.5, loose=2.2)


def knocks(track, box, trim_db=-1, wall_width_hz=230):
    """Bumps shake only the box walls, each spot at its own pitch."""
    for start_s, db, hz, contact_s in KNOCKS:
        add_blow(track, start_s, double_band(box, hz, wall_width_hz), db + trim_db, contact_s)


def booms(track):
    """Big panels flex: a short push rings one broad low resonance."""
    for start_s, db, hz in BOOMS:
        panel = double_band(signal.unit_impulse(4096), hz, BOOM_SHARE * hz)
        add_blow(track, start_s, panel, db, BOOM_DECAY_S)


def ticks(track, flap, film_trim_db=-1, flap_trim_db=-3, decay_s=0.00088):
    """Popping creases and the rattling knife: each tick is a very short blow with a bright and a duller part."""
    snap = response(SNAP)
    for start_s, film_db, flap_db in TICKS:
        add_blow(track, start_s, patch(snap), film_db + film_trim_db, decay_s, first=10, loose=.6)
        add_blow(track, start_s, flap, flap_db + flap_trim_db, decay_s)


def rips(track, film, flap, box, flap_trim_db=-1, box_trim_db=-2, box_lag_s=0.00065, own_db=2, flap_width_hz=450):
    """A rip shakes the whole parcel: tape and flap at once, the hollow box a moment later."""
    for start_s, film_db, flap_db, box_db, hz, decay_s in RIPS:
        torn_flap = flap + undb(own_db) * band(flap, hz, flap_width_hz)
        hollow_box = hollow(box, np.interp(start_s, *np.transpose(HOLLOW_PITCH)))
        add_blow(track, start_s, patch(film), film_db, decay_s, loose=LOOSE)
        add_blow(track, start_s, torn_flap, flap_db + flap_trim_db, decay_s, loose=LOOSE)
        add_blow(track, start_s + box_lag_s, hollow_box, box_db + box_trim_db, decay_s * 0.5)


def blows(film, flap, box):
    """All the short events on one track: knife, knocks, booms, ticks and rips."""
    track = np.zeros(N)
    knife_down(track)
    knocks(track, box)
    booms(track)
    ticks(track, flap)
    rips(track, film, flap, box)
    return track


def scene():
    """The parcel's three parts, played by blows and handling, in the yard."""
    film, flap, box = response(FILM), response(FLAP), response(BOX)
    flap = flap + ring(flap, PANELS)
    box = box + ring(box, PANELS)
    background = outdoors()
    hands = undb(-6) * (squeals() + creaks() + slicing() + handling(film, flap, box))
    rubbed = yard(hands, near_db=0, tail_db=-3)
    struck = yard(blows(film, flap, box), near_db=-4, tail_db=-7.5)
    # half the difference goes to each side
    balance = undb(np.outer([.5, -.5], curve(SIDE)))
    return (struck + rubbed) * balance + background


def record(dry):
    """The two microphone ports colour the sound differently; strong peaks are rounded and the top is cut."""
    ports = np.array([through(x, response(PORTS, share)) for x, share in zip(dry, (.5, -.5))])
    rounded = .8 * np.tanh(ports / .8)
    return signal.sosfilt(signal.ellip(8, .2, 70, TOP_HZ, fs=SR, output="sos"), rounded)


dry = scene()
out = record(dry)
materialize(out)
```